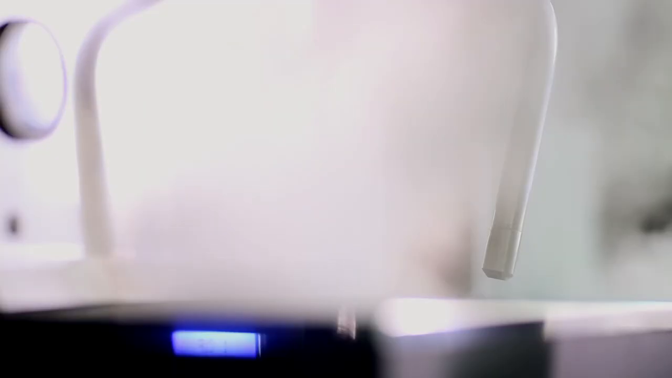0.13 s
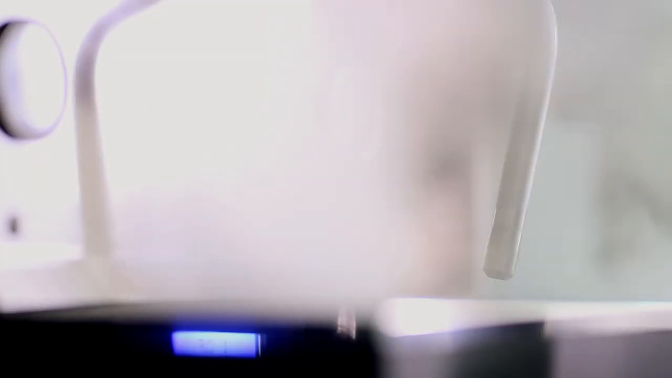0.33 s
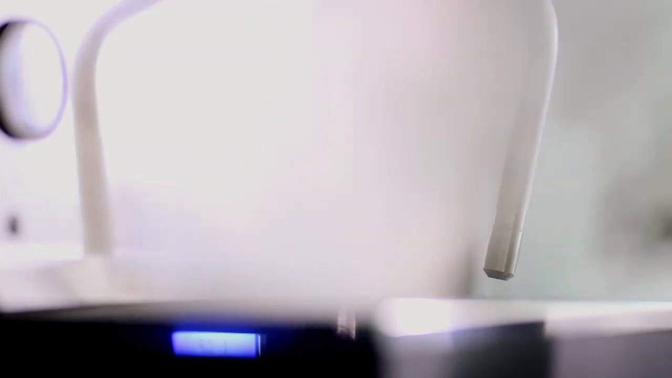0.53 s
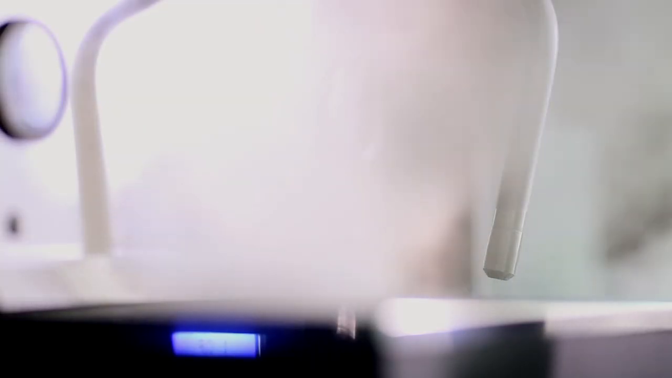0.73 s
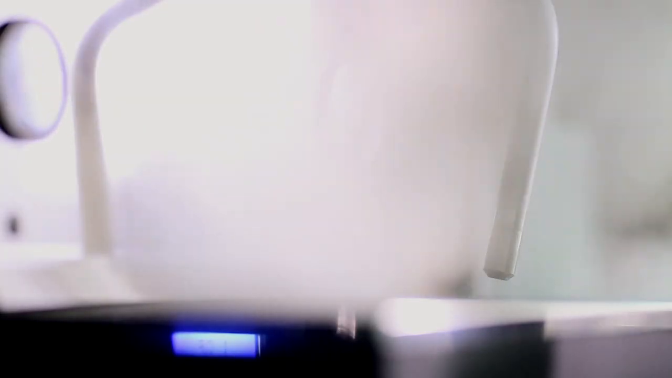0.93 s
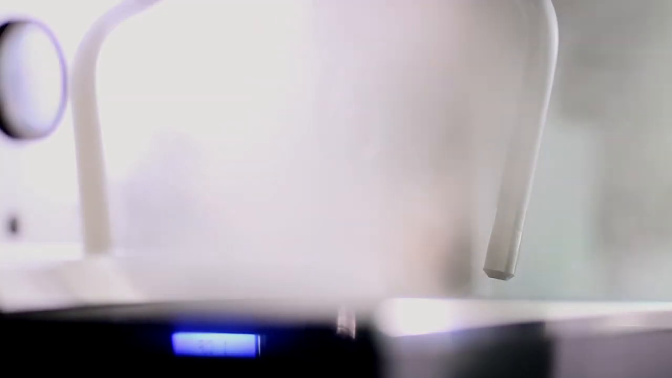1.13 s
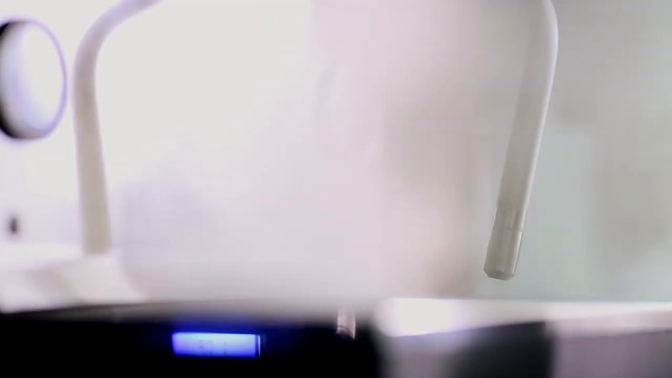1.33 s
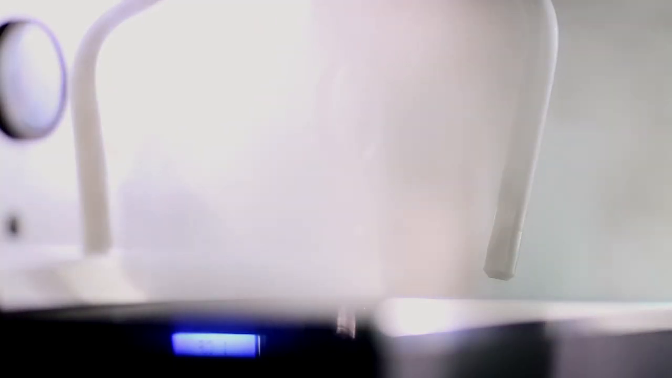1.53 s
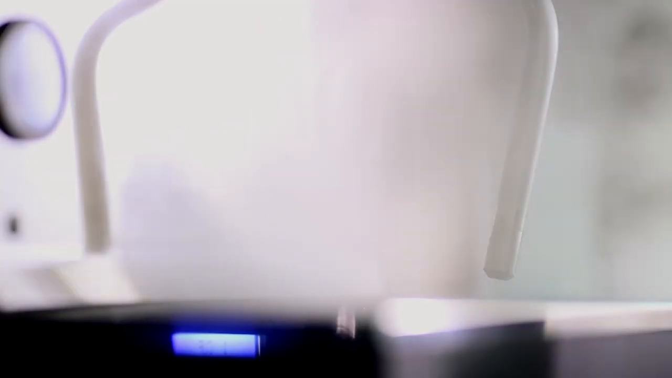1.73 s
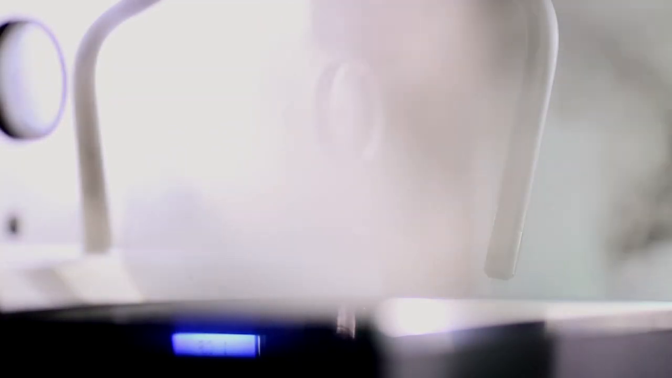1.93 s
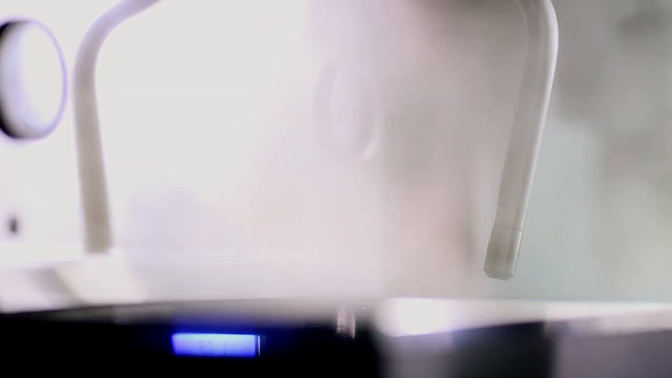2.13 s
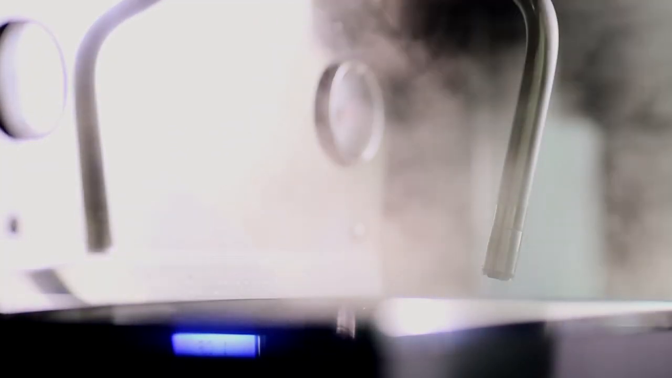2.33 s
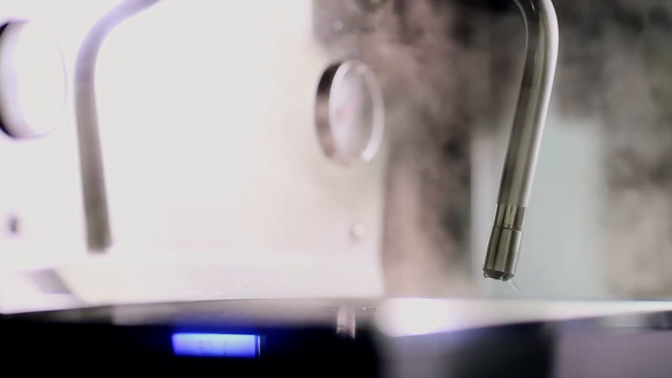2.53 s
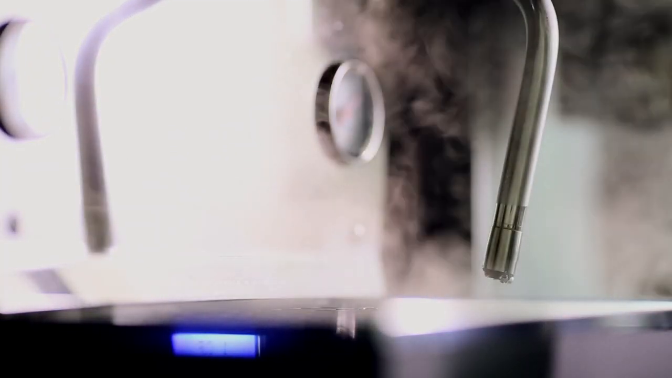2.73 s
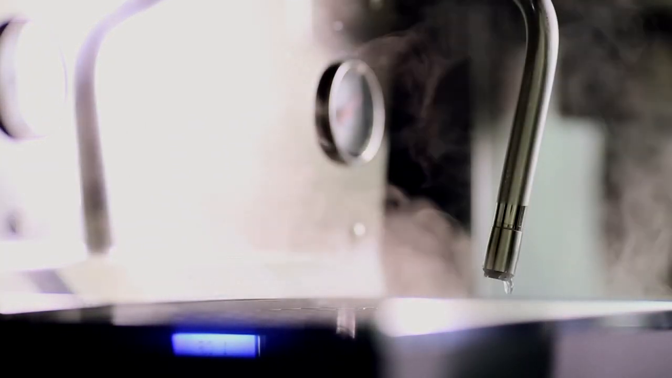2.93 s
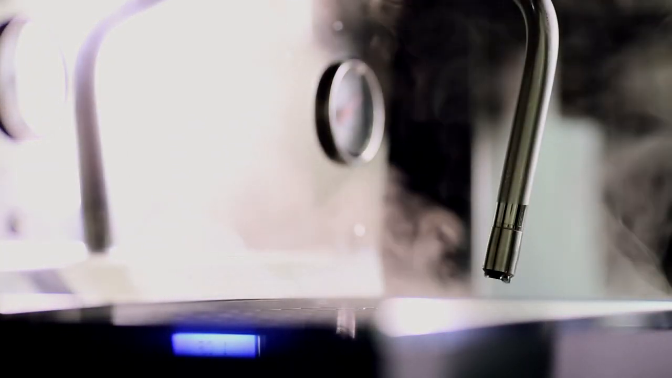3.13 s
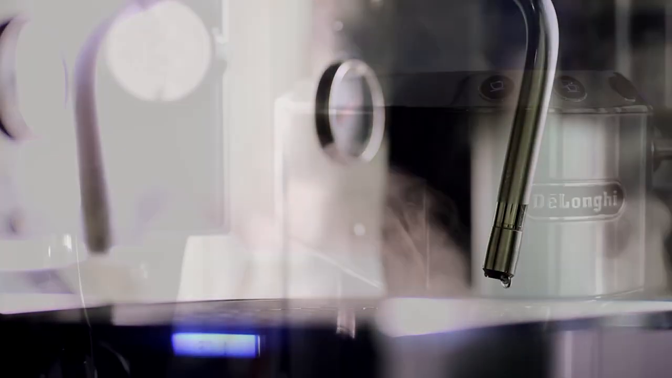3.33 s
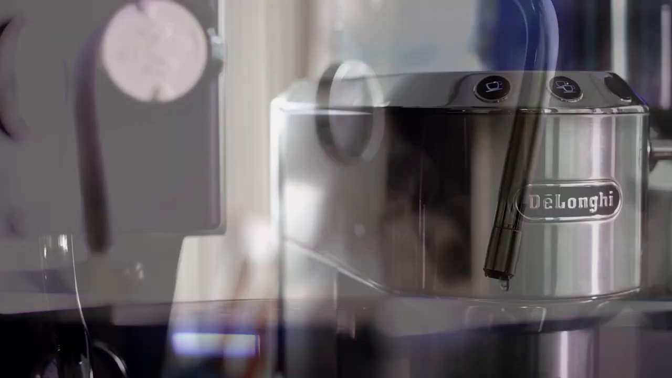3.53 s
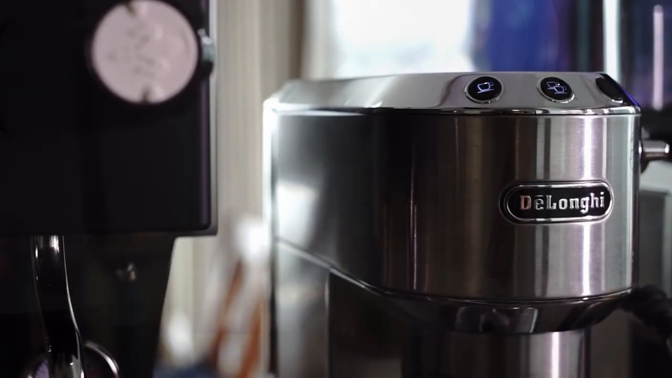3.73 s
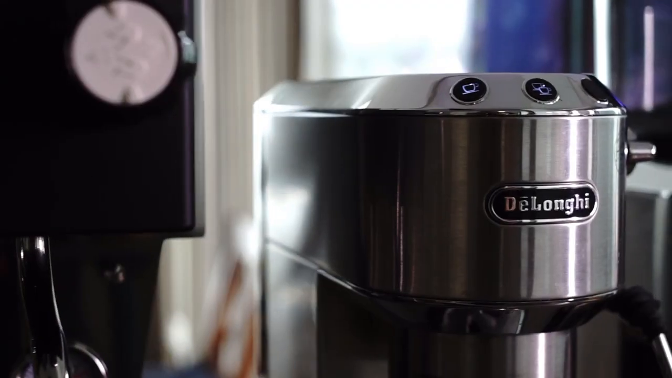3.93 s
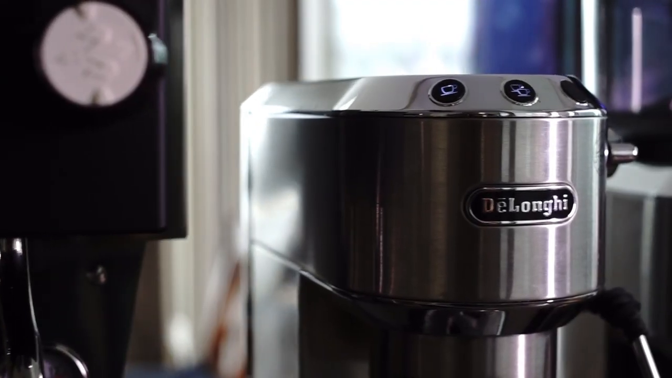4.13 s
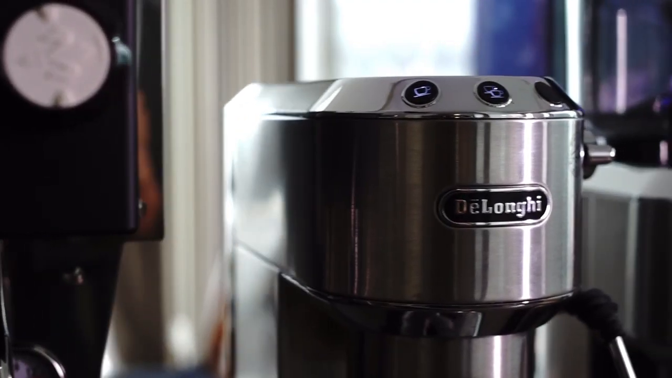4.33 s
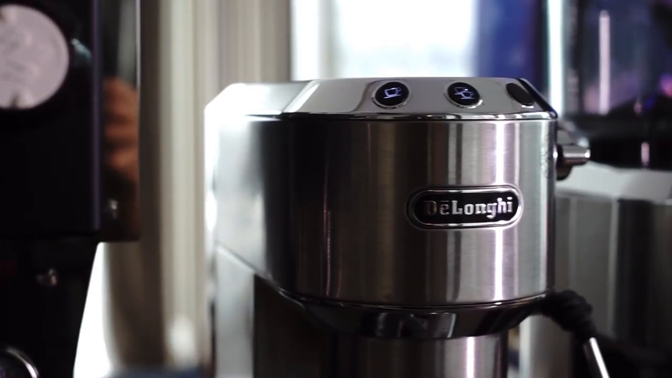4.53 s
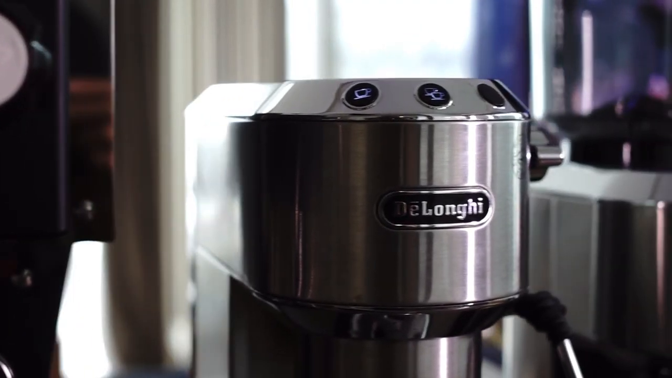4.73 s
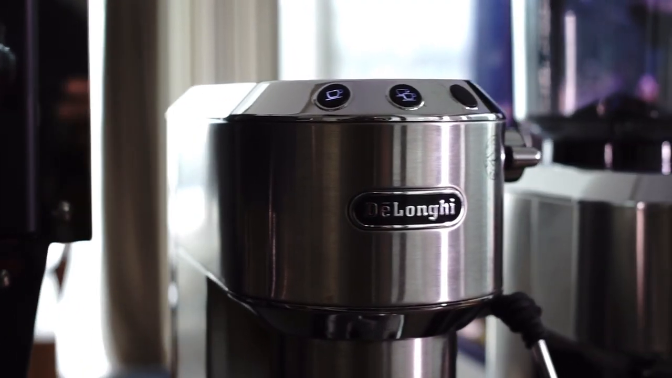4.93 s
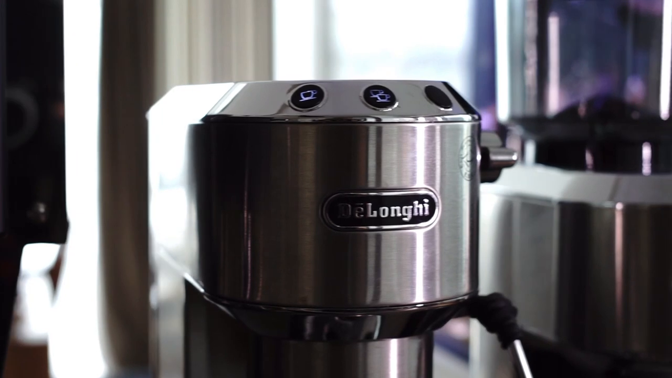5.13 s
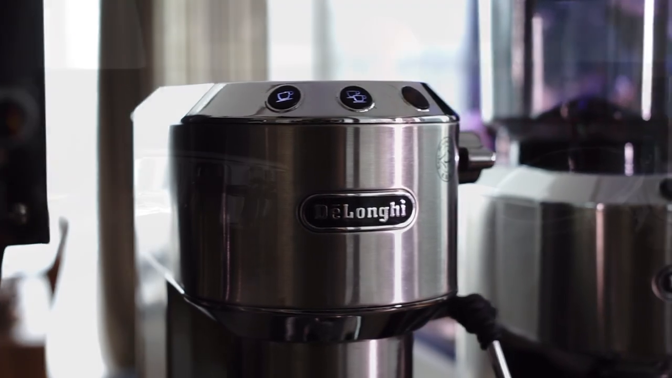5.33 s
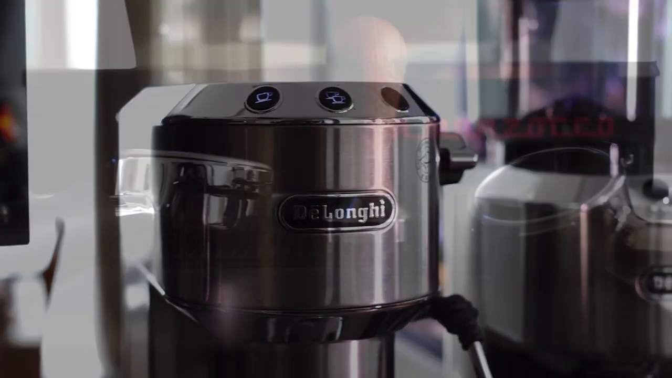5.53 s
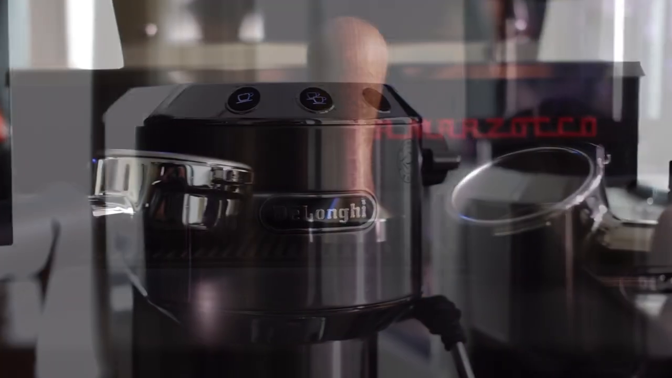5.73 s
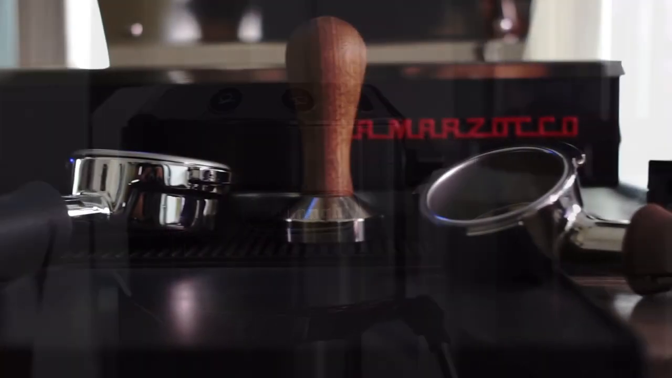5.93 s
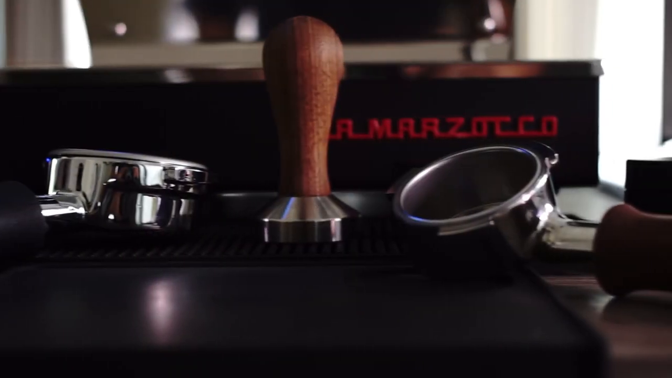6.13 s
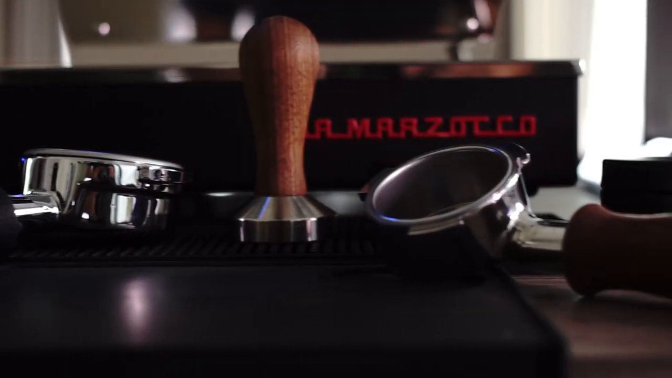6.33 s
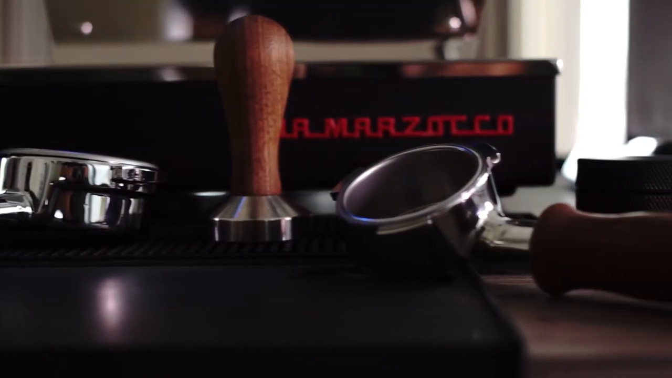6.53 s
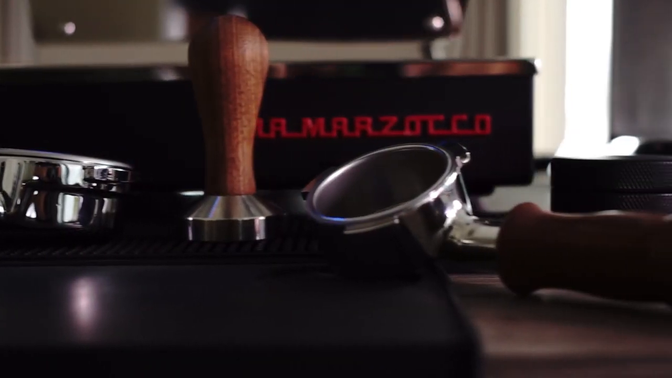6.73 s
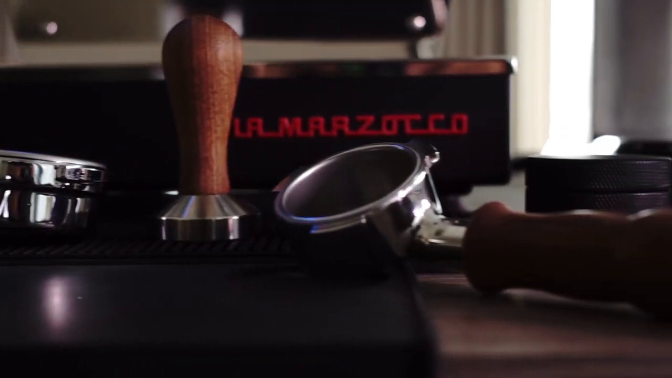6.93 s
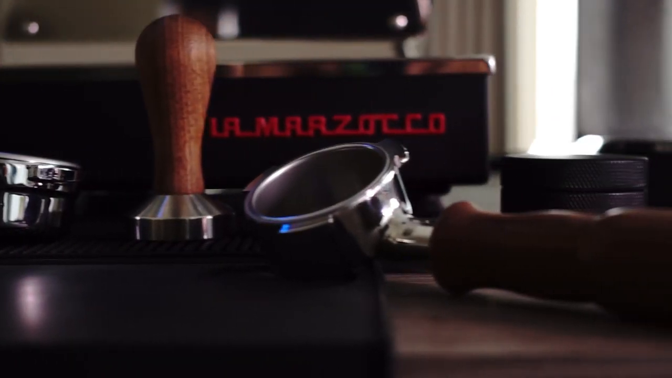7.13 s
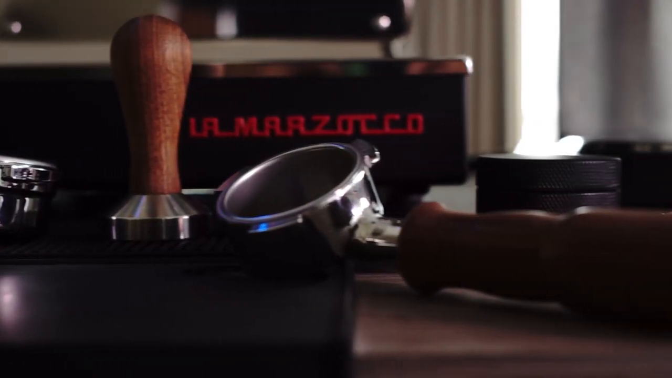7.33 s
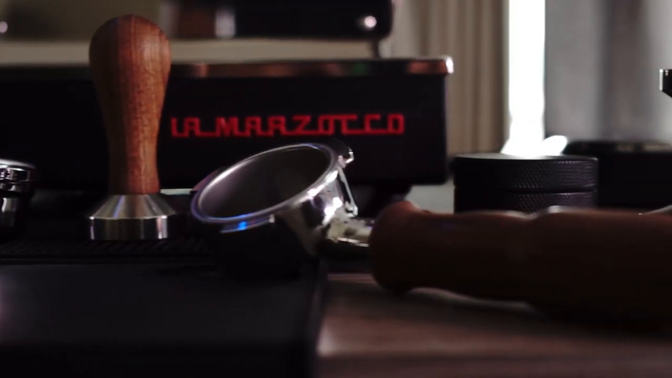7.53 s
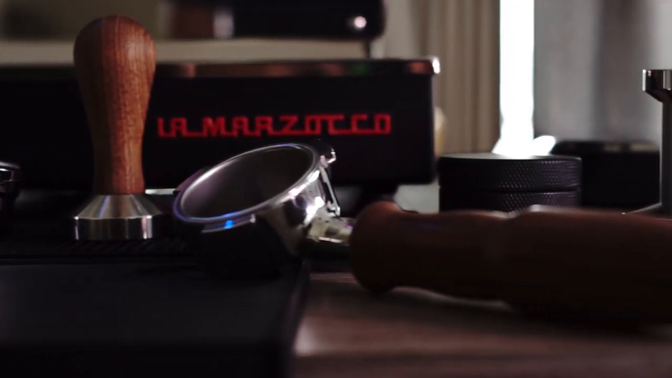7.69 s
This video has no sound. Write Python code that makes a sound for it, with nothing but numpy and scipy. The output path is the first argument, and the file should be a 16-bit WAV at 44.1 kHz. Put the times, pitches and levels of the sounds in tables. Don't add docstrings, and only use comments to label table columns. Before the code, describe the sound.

A dense steam jet starts already at full force, with a roaring tube and wash on metal beneath it, miked closely in mono. It collapses quickly into sputters and plops. Afterwards everything is very quiet: swelling low room hum, compressor drone, tiny distant metallic ticks in stereo, and finally muffled cabinet knocks, faint duct tones and light crockery touches.

```python
import sys
import numpy as np
from scipy import signal
from scipy.fft import rfft, irfft, next_fast_len
from scipy.io import wavfile
from scipy.ndimage import uniform_filter1d, map_coordinates

SR = 44100
rng = np.random.default_rng(int(sys.argv[2]) if len(sys.argv) > 2 else 0)


def generate_wav(sig):
    pcm = np.round(np.clip(np.atleast_2d(sig).T, -1, 1) * 32767).astype(np.int16)
    wavfile.write(sys.argv[1], SR, pcm)


def field_ratio(decibels):
    return 10 ** (np.asarray(decibels, dtype=float) / 20)


N = 342216
T = np.arange(N) / SR


def unit(x):
    return x / np.sqrt(np.mean(x ** 2) + 1e-20)


def along(points, hz):
    f, v = np.transpose(points)
    return np.interp(np.log(hz + 1), np.log(f + 1), v)


def laid(x, start_s):
    start = round(start_s * SR)
    out = np.zeros(x.shape[:-1] + (N,))
    out[..., start:][..., :x.shape[-1]] = x[..., :N - start]
    return out


def wobble(rate):
    coarse = np.arange(0, N + 64, 64)
    knots = rng.standard_normal(int(N * rate / SR) + 40)
    return np.interp(np.arange(N), coarse, map_coordinates(knots, [coarse * rate / SR]))


def swelling(rest_db, swells):
    t = np.arange(0, N + 64, 64) / SR
    bumps = sum(field_ratio(db) ** 2 * np.exp(-(2.4 * (t - s) / length) ** 2) for s, length, db in swells)
    return np.interp(T, t, np.sqrt(field_ratio(rest_db) ** 2 + bumps))


def filtered(x, response):
    m = next_fast_len(x.shape[-1] + 8192)
    return irfft(rfft(x, m) * response(np.fft.rfftfreq(m, 1 / SR)), m)[..., :x.shape[-1]]


def resonant(modes, hz):
    return np.sqrt(sum(field_ratio(db) ** 2 / w / (1 + (2 * (hz - c) / w) ** 2) ** 2 for c, w, db in modes))


def patchy(patchy_db, size, channels=1):
    z = signal.stft(rng.standard_normal((channels, size)), nperseg=512)[2]
    field = uniform_filter1d(rng.standard_normal(z.shape[1:]), size=6, axis=0)
    field = uniform_filter1d(field, size=10, axis=1)
    return signal.istft(z * field_ratio(patchy_db * unit(field)), nperseg=512)[1][:, :size]


def jet_band(spectrum, patchy_db, walls):
    t = np.arange(SR // 8) / SR
    walls_answer_late = np.clip(t / 0.012 - 1, 0, 1)
    echo = rng.standard_normal(len(t)) * field_ratio(-60 * t / 0.13) * walls_answer_late
    echo /= np.linalg.norm(echo)

    def response(hz):
        comb = 1 + walls * rfft(echo, 2 * len(hz) - 2)
        no_bass = hz ** 3 / (hz ** 3 + 220 ** 3)
        return field_ratio(along(spectrum, hz)) * no_bass * comb

    return laid(unit(filtered(patchy(patchy_db, size=4 * SR)[0], response)), 0)


EVENING = 0.65


def singing(mode, alike):
    hz, width_hz, db = mode
    m = next_fast_len(N)
    bins = np.fft.rfftfreq(m, 1 / SR)
    near = np.abs(bins - hz) < 10 * width_hz
    spectrum = np.zeros((2, len(bins)), complex)
    draws = rng.standard_normal((2, len(bins), 2))[:, near] @ [1, 1j]
    spectrum[:, near] = draws * resonant([(hz, width_hz, 0)], bins[near])
    pair = unit(irfft(spectrum, m)[:, :N])
    beat = int(np.clip(SR / width_hz / 4, SR // 200, SR // 30))
    strength = np.sqrt(np.abs(uniform_filter1d(pair ** 2, size=beat, axis=1)) + 0.05)
    shared, apart = pair / strength ** EVENING
    turn = np.arccos(np.clip(along(alike, hz), -1, 1)) / 2
    return field_ratio(db) * unit(np.cos(turn) * shared + np.sin(turn) * apart * [[1], [-1]])


DUCK_DB, RECOVER_FROM_S, RECOVER_S = 10.5, 2.075, 0.84


def recovering():
    return -DUCK_DB * np.clip(1 - (T - RECOVER_FROM_S) / RECOVER_S, 0, 1)


# [t/s, jump level/dB, sag time/s]
SURGES = [
    (0.0, 3, 0.088),
    (.085, 2, 0.14),
    (.485, 1.5, 0.041),
    (.5, 1.5, 3),
    (.7, -0.2, 0.072),
    (1.899, 0.5, 0.089),
    (2.05, 1, 0.1),
]
# [t/s, level/dB]
VALVE = [
    (2.135, -1.5),
    (2.178, -10),
    (2.218, -12),
    (2.278, -21.5),
    (2.33, -18.5),
    (2.43, -33),
    (2.6, -33),
    (2.74, -38),
]
SURGE_RISE_S = 0.0063


def steam():
    press_db = 0
    for s, db, sag_s in SURGES:
        rise = np.clip((T - s) / SURGE_RISE_S + (s == 0), 0, 1)
        press_db = press_db + db * rise * np.exp(-np.abs(T - s) / sag_s)
    flow_db = np.interp(T, *np.transpose(VALVE))
    flutter_db = 0.17 * wobble(15.0) + 0.2 * wobble(24.17)
    flowing = np.clip((2.66 - T) / 0.18, 0, 1)
    jet = wand_roar(press_db, flow_db, flutter_db) + tray_wash(press_db, flow_db, flutter_db)
    jet += wet_lip(press_db, flow_db) + tray_pool(flow_db)
    hiss = nozzle_hiss(press_db, flow_db, flutter_db, flowing)
    return hiss + np.sqrt(flowing) * jet + kitchen_air()


# [f/Hz, level/dB per Hz]
NOZZLE = [(2350, -26.5), (4000, -11), (4560, -11), (4900, -6), (5100, -4), (5600, -3.5), (6100, -2.5),
          (6850, -3.5), (11700, -3.5), (13200, -4.5), (15500, -8.5)]
# [f/Hz, level/dB per Hz]
DRIBBLE = [(2350, -23.5), (4000, -13), (7250, -12), (10800, -19.5), (11700, -20.5), (14000, -25),
           (15500, -27)]
HISS_DB, AIR_DB = -18.5, -56


def nozzle_hiss(press_db, flow_db, flutter_db, flowing):
    strong = np.clip((flow_db + 21.0) / 14, 0, 1)
    hiss = np.sqrt(strong) * jet_band(NOZZLE, 0.37, walls=0.35)
    hiss += np.sqrt(1 - strong) * jet_band(DRIBBLE, 1.5, walls=0.11)
    jet_gain = flowing ** 0.22 * field_ratio(HISS_DB + press_db + flow_db)
    return hiss * np.hypot(jet_gain, field_ratio(AIR_DB + recovering())) * field_ratio(flutter_db)


# [f/Hz, level/dB per Hz]
WAND = [(240, -15), (380, -15.5), (440, -6.5), (516, -15), (650, -5), (780, -6.5), (890, 0.5), (1000, -5.5),
        (1076, -2), (1125, -13.5), (1200, -8), (1500, -22), (1950, -19), (3300, -120)]
ROAR_DB, ROAR_SWINGS, ROAR_FALLS = -41, 1.84, 0.49


def wand_roar(press_db, flow_db, flutter_db):
    level_db = ROAR_DB + ROAR_SWINGS * press_db + ROAR_FALLS * flow_db + 0.24 * flutter_db
    return field_ratio(level_db) * jet_band(WAND, 0.93, walls=0.39)


# [f/Hz, level/dB per Hz]
TRAY = [(740, -33), (1200, -5), (1460, -1), (1720, -5.5), (1980, -2.5), (2100, -6), (2280, -4), (2520, -6),
        (2670, -0.5), (2840, -1.5), (3010, -1.5), (3360, -5.5), (3950, -4), (4600, -3.5), (5980, -26),
        (10100, -120)]
WASH_DB, WASH_SWINGS, WASH_FALLS = -34.5, 1.92, 0.76


def tray_wash(press_db, flow_db, flutter_db):
    level_db = WASH_DB + WASH_SWINGS * press_db + WASH_FALLS * flow_db + 0.2 * flutter_db
    return field_ratio(level_db) * jet_band(TRAY, 0.75, walls=0.42)


# [f/Hz, level/dB per Hz]
LIP = [(3000, -38), (3700, -9), (4090, -5), (4500, -12), (4780, -6), (4930, 2), (5080, -8), (5800, -40)]
LIP_DB, LIP_SWINGS, LIP_DRIES_DB_PER_S = -34.5, 1.6, 5


def wet_lip(press_db, flow_db):
    level_db = LIP_DB + LIP_SWINGS * press_db + flow_db - LIP_DRIES_DB_PER_S * T
    return field_ratio(level_db) * jet_band(LIP, 1.1, walls=0.38)


# [f/Hz, level/dB per Hz]
POOL = [(1000, -35), (1300, -4), (1500, 0), (1900, -7), (2300, -35)]
POOL_SWELL = -60, [(.95, .3, -46), (1.25, 0.59, -43), (1.8, 0.66, -46)]


def tray_pool(flow_db):
    return swelling(*POOL_SWELL) * field_ratio(WASH_FALLS * flow_db) * jet_band(POOL, 1.1, walls=0.35)


# [f/Hz, level/dB per Hz]
KITCHEN = [(260, -30), (450, -14), (608, 2.5), (658, -1.5), (776, -1), (839, -2.5), (1090, -3),
           (2590, -11.5), (4600, -19.5), (5980, -27), (10100, -120)]
# [f/Hz, level/dB per Hz]
TOP_AIR = [(6000, -30), (9000, -3), (12000, 0), (15500, -6)]
TOP_AIR_SWELL = -90, [(3.4, .35, -66)]
KITCHEN_DB = -43.5


def kitchen_air():
    kitchen = field_ratio(KITCHEN_DB + recovering()) * jet_band(KITCHEN, 0.65, walls=0.07)
    return kitchen + swelling(*TOP_AIR_SWELL) * jet_band(TOP_AIR, 1.2, walls=0.05)


# [f/Hz, width/Hz, level/dB]
WAND_RING = [(796, 110, -3.5), (910, 80, -3), (450, 34, -5)]
RING = -52, [(2.316, .06, -43), (2.54, 0.13, -45)]
# [f/Hz, width/Hz, level/dB]
OVERTONE_MODE = (1920, 95, 0)
OVERTONE = -70, [(2.33, .07, -46.5), (2.49, 0.053, -54)]


def wand_ring():
    noise = rng.standard_normal(N)
    tube = unit(filtered(noise, lambda hz: resonant(WAND_RING, hz))) * field_ratio(1.2 * wobble(39.9))
    overtone = swelling(*OVERTONE) * singing(OVERTONE_MODE, [(100, 0.86)])[0]
    gate = np.clip((T - 2.26) / 0.035, 0, 1) * np.clip((2.58 - T) / 0.017, 0, 1)
    return (swelling(*RING) * tube + overtone) * gate


# [t/s, peak level/dB, low part level/dB, t60/s, ring f/Hz]
SPITS = [
    (2.317, -20, -10, 0.14, 1500),
    (2.4566, -38.5, -4, 0.13, 1500),
    (2.592, -29.5, 0.5, 0.22, 2460),
    (2.593, -35, 8, 0.08, 1820),
    (2.637, -38, 12, 0.091, 1750),
    (2.652, -31.5, 4, 0.2, 1300),
    (2.69, -40, 8, .08, 1400),
    (2.785, -40, 8, 0.08, 1100),
]


def spits():
    out, t = np.zeros(N + SR), np.arange(SR // 3) / SR
    puff = [(1500, -23), (3000, -4), (10000, -7), (14000, -24)]  # (Hz, dB per Hz)
    for s, db, low_db, t60, ring_hz in SPITS:
        high, low = rng.standard_normal((2, len(t)))
        high = unit(filtered(high, lambda hz: field_ratio(along(puff, hz))))
        low = unit(filtered(low, lambda hz: resonant([(900, 310, -3), (ring_hz, 200, 3)], hz)))
        shape = field_ratio(db - 16.0 - 60 * t / t60) * (1 - np.exp(-t / 0.0015))
        out[round(s * SR):][:len(t)] += shape * (high + field_ratio(low_db) * low)
    return out[:N]


def struck(rows, shape):
    out, t = np.zeros(N + SR), np.arange(SR // 10) / SR
    for s, db, *pitch in rows:
        out[round(s * SR):][:len(t)] += field_ratio(db) * shape(t, *pitch)
    return out[:N]


# [t/s, peak level/dB, f/Hz]
THUDS = [(5.977, -36, 557), (5.995, -38, 573), (6.032, -38, 541), (6.136, -38, 528), (6.193, -34, 581),
         (6.243, -37, 576), (6.263, -35, 576), (6.303, -41, 533), (6.41, -37, 592), (6.565, -30, 603),
         (6.625, -34, 560), (6.651, -36, 533), (6.7, -38, 476), (6.908, -40, 584), (7.123, -38, 576),
         (7.238, -39, 595), (7.324, -40, 528), (7.406, -40, 530), (7.447, -40, 571), (7.492, -40, 581),
         (7.562, -38, 624), (7.611, -35, 592), (7.678, -39, 603), (7.7, -39, 581)]
THUD_RISE_S, THUD_T60_S = 0.003, 0.066


def thuds():
    def bump(t, hz):
        wander = 2.1 * np.cumsum(rng.standard_normal(len(t))) / 30
        shape = field_ratio(-60 * t / THUD_T60_S) * (1 - np.exp(-t / THUD_RISE_S))
        return np.sin(2 * np.pi * hz * t + wander) * shape
    return field_ratio(-5) * struck(THUDS, bump)


# [t/s, peak level/dB, first f/Hz, last f/Hz]
SNAPS = [
    (7.6005, -48, 2400, 1000),
    (7.7345, -40, 3600, 1850),
    (7.738, -45, 1900, 1400),
    (5.328, -50, 5000, 2500),
    (4.41, -51, 5900, 2800),
]
SNAP_S = 0.0035


def snaps():
    def snap(t, first_hz, last_hz):
        hz = last_hz + (first_hz - last_hz) * np.exp(-2 * t / SNAP_S)
        shape = np.exp(-(t / SNAP_S) ** 2) * (1 - np.exp(-t / 0.0004))
        return np.sin(2 * np.pi * np.cumsum(hz) / SR) * shape
    return struck(SNAPS, snap)


def ticks(rows, width_hz, hiss_from_hz, rise_s):
    def hiss_band(hz):
        return 1 / (1 + (hiss_from_hz / (hz + 1)) ** 6) / (1 + (hz / 13000) ** 4)

    out, t = np.zeros((2, N + SR)), np.arange(SR // 8) / SR
    for s, db, ring_hz, wide_db, t60 in rows:
        ring, wide = rng.standard_normal((2, 2, len(t)))
        ring = unit(filtered(ring, lambda hz: resonant([(ring_hz, width_hz, 0)], hz)))
        wide = unit(filtered(wide, hiss_band))
        shape = field_ratio(-60 * t / t60) * (1 - np.exp(-t / rise_s))
        puff = shape * (field_ratio(db + 1.0) * ring + field_ratio(wide_db + 10.0) * wide)
        out[:, round((s - rise_s / 2) * SR):][:, :len(t)] += puff
    return out[:, :N]


# [t/s, peak level/dB, ring f/Hz, wide hiss level/dB, t60/s]
TICKS = [(3.1228, -43, 3000, -66, 0.064), (3.255, -42, 3750, -66.5, 0.067), (3.8661, -46, 3700, -58, 0.15),
         (4.409, -43, 3460, -53.5, 0.13), (4.7651, -52, 4630, -53, 0.12), (5.2485, -49, 3680, -57, 0.094),
         (5.3273, -45, 3100, -50.5, 0.14), (5.7994, -54, 4060, -55.5, 0.19), (6.123, -44, 3050, -60, 0.08),
         (6.2994, -48, 4600, -69, 0.096), (7.162, -48, 4500, -62, 0.086), (6.226, -46, 3500, -66, 0.07),
         (6.33, -45, 3100, -62, 0.08), (6.1, -52, 6000, -69, 0.06), (4.655, -45, 2900, -69, 0.078)]
# [t/s, peak level/dB, ring f/Hz, wide hiss level/dB, t60/s]
EXTRA_TICK = [
    (3.26, -47.5, 4650, -66, 0.12),
]
# [t/s, peak level/dB, ring f/Hz, wide hiss level/dB, t60/s]
BRIGHT_TICKS = [(3.5184, -50, 11100, -59, 0.06), (3.875, -49, 8400, -66, 0.07),
                (4.0886, -43, 12500, -59, 0.06), (4.3294, -47, 14200, -63, 0.052),
                (4.6994, -49, 7150, -64.5, 0.13), (5.442, -48, 7000, -69, 0.08),
                (3.325, -56, 8000, -71, 0.085), (5.2894, -47, 7290, -60, 0.066),
                (5.442, -47, 12800, -56, 0.076), (5.541, -46, 6960, -57, 0.084),
                (5.6201, -48, 9880, -61, 0.06), (5.9594, -51, 11600, -62, 0.06),
                (6.1794, -49, 8130, -59, 0.079), (6.6782, -50, 8600, -63, 0.12),
                (6.645, -53, 10600, -68, .07), (7.177, -55, 8600, -66, .05), (7.44, -53, 12500, -56, 0.078)]
# [t/s, peak level/dB, ring f/Hz, wide hiss level/dB, t60/s]
TOP_TICKS = [
    (4.7247, -47, 13700, -60, 0.08),
    (5.249, -51, 10200, -59, 0.08),
    (5.7194, -56, 11700, -65, 0.08),
    (6.6782, -54, 13500, -64, 0.15),
    (7.27, -56, 13000, -68, .06),
    (7.7194, -49, 9630, -65, 0.08),
    (3.588, -53, 13000, -63, 0.05),
    (3.71, -54, 13500, -66, 0.06),
    (5.29, -54, 15000, -68, 0.05),
]
# [t/s, peak level/dB, ring f/Hz, wide hiss level/dB, t60/s]
CLICKS = [
    (7.529, -41, 1530, -61, 0.033),
    (7.515, -46, 2300, -64, 0.04),
    (7.542, -47, 2900, -64, 0.04),
    (7.5544, -40, 2080, -59, 0.03),
    (7.6005, -34, 2060, -61, 0.02),
    (7.7343, -39, 2600, -58, 0.019),
]
# [t/s, peak level/dB, ring f/Hz, wide hiss level/dB, t60/s]
CHIRPS = [(4.266, -45, 4500, -72, .05), (4.268, -47, 5150, -72, .045), (4.596, -44, 4400, -72, .07),
          (4.764, -41, 4500, -70, .07), (4.768, -44, 4950, -72, .06), (4.779, -43, 4550, -72, .06),
          (5.595, -44, 4280, -70, .07), (5.79, -45, 2780, -70, .06), (6.86, -53, 4100, -72, .12),
          (7.02, -49, 3500, -66, .05), (7.205, -50, 3600, -72, .08), (7.18, -49, 1900, -66, .06)]


def far_ticks():
    far = ticks(TICKS + EXTRA_TICK, 650, 2300, 0.008)
    far += ticks(BRIGHT_TICKS, 1300, 7000, 0.0079)
    far += ticks(TOP_TICKS, 2200, 9000, 0.009)
    far += field_ratio(-3.0) * ticks(CLICKS, 1600, 6000, 0.00147)
    return far + ticks(CHIRPS, 330, 3000, 0.0054)


def room_noise(colour, modes, alike, lean_db, patchy_db):
    def mid_side(hz):
        turn = np.arccos(np.clip(along(alike, hz), -1, 1)) / 2
        gain = np.hypot(field_ratio(along(colour, hz) - 21), resonant(modes, hz))
        return gain * [np.cos(turn), np.sin(turn)]

    mid, side = filtered(patchy(patchy_db, size=4 * SR, channels=2), mid_side)
    return np.array([mid + side, mid - side]) * field_ratio([[lean_db / 2], [-lean_db / 2]])


def split(x, low_hz, high_hz, start_s):
    low = filtered(x, lambda hz: 1 / (1 + (hz / low_hz) ** 8))
    high = filtered(x, lambda hz: 1 - 1 / (1 + (hz / high_hz) ** 8))
    return [laid(unit(part), start_s) for part in (low, x - low - high, high)]


# [f/Hz, level/dB per Hz]
HUM_COLOUR = [(15, -55), (25, -14.5), (65, -19), (128, -8), (243, -1.5), (330, -4), (364, -10), (430, -6.5),
              (600, -13), (700, -41), (910, -46), (1540, -120)]
# [f/Hz, width/Hz, level/dB]
HUM_MODES = [(179.3, 3.1, -5.5), (379, 15, -13.5)]
MOTOR = -51.5, [(3.18, 0.36, -46)]
FIRST_MODE = -52, [(2.76, 0.042, -36), (2.95, 0.21, -39.5), (3.3, 0.17, -42)]
FIRST_LOW_MODE = -59, [(2.1, .15, -42), (2.88, 0.19, -41), (3.15, 0.38, -44.5)]
HUM_DB, RUMBLE_DB, MOTOR_HZ = -41, -60.5, 135


def hum():
    room = room_noise(HUM_COLOUR, HUM_MODES, [(100, 0.96)], 0, 0.58)[0]
    rumble, body, _ = split(room, 98, 3000, 0)
    motor = np.sin(2 * np.pi * np.cumsum(MOTOR_HZ + 0.45 * wobble(3.3)) / SR)
    motor *= field_ratio(3.5 + 1.1 * wobble(7.64)) * swelling(*MOTOR)
    mode = swelling(*FIRST_MODE) * singing((246, 20, -2), [(100, 0.88)])[0]
    mode += swelling(*FIRST_LOW_MODE) * singing((175, 10, -2), [(100, 0.88)])[0]
    return field_ratio(recovering()) * (field_ratio(HUM_DB) * body + field_ratio(RUMBLE_DB) * rumble + motor + mode)


# [f/Hz, level/dB per Hz]
SECOND_COLOUR = [(15, -50), (25, -13), (59, -12.5), (113, -9), (164, -5), (221, -5.5), (253, -3.5),
                 (331, -8.5), (537, -17.5), (614, -19.5), (1110, -24), (3720, -35.5), (4150, -36),
                 (4500, -36.5), (12000, -45), (15500, -47)]
# [f/Hz, width/Hz, level/dB]
SECOND_MODES = [(166, 30, -13), (424, 13, -17), (520, 25, -20), (2850, 120, -30)]
# [f/Hz, left-right likeness/1]
SECOND_ALIKE = [(60, 1.0), (130, 0.99), (290, 0.97), (640, 0.81), (1410, 0.43), (3100, 0.39), (6820, -0.41),
                (15000, 0.35)]
SECOND_MODE = -64, [(3.92, 0.11, -40), (4.12, 0.097, -37.5), (4.4, 0.16, -38), (4.57, 0.19, -37),
               (4.86, 0.15, -37), (5.03, 0.088, -41.5), (5.17, 0.11, -40), (5.4, .1, -43)]
SECOND_LOW_MODE = -54, [(3.62, .15, -40), (3.85, .3, -45.5), (4.5, 0.4, -42.5), (5.15, 0.18, -40.5),
                   (5.45, .25, -45)]
SECOND_LOW_DB, SECOND_MID_DB, SECOND_AIR_DB = -40, -46.5, -59
DRONE_HZ, DRONE_DB = 66.5, -49


def second_place():
    room = room_noise(SECOND_COLOUR, SECOND_MODES, SECOND_ALIKE, -0.68, 0.84)
    low, mid, air = split(room, 525, 2900, 3)
    tone = field_ratio(SECOND_LOW_DB + 1.1 * wobble(4.97)) * low + field_ratio(SECOND_MID_DB) * mid
    tone += field_ratio(SECOND_AIR_DB + 5.0 + 0.37 * wobble(7.3)) * air
    drone = np.sin(2 * np.pi * np.cumsum(DRONE_HZ + 0.35 * wobble(2.87)) / SR)
    drone *= field_ratio(DRONE_DB + 3.0 + 0.3 * wobble(6))
    mode = swelling(*SECOND_MODE) * singing((251, 5, -2), SECOND_ALIKE)
    mode += swelling(*SECOND_LOW_MODE) * singing((167, 7, -2), SECOND_ALIKE)
    return tone + mode * field_ratio([[-0.6], [0.6]]) + drone


# [f/Hz, level/dB per Hz]
THIRD_COLOUR = [(15, -46), (25, -13), (59, -19.5), (164, -4.5), (253, -7.5), (399, -14), (582, -9.5),
                (666, -21.5), (945, -26.5), (1140, -34), (1240, -36), (1710, -40.5), (4150, -39.5),
                (11500, -50), (15500, -53)]
# [f/Hz, width/Hz, level/dB]
THIRD_MODES = [(96.4, 9.2, -13), (242, 13, -11), (567, 8.6, -17), (612, 13, -15.5), (716, 4, -24.5)]
# [f/Hz, left-right likeness/1]
THIRD_ALIKE = [(60, 0.98), (130, 1), (290, 0.96), (640, 0.77), (1410, 0.037), (3100, 0.091), (6820, -0.32),
               (15000, 0.29)]
THIRD_MIDDLE = -49, [(5.88, 0.16, -46), (6.01, .06, -47), (6.14, .05, -48), (6.25, .08, -47),
                (6.42, .04, -46), (6.5, .1, -55), (6.61, 0.11, -45), (6.75, .04, -46), (6.83, 0.092, -43.5),
                (7.14, .05, -45), (7.5, .03, -50), (7.56, 0.027, -49), (7.62, .04, -45), (7.71, 0.087, -48)]
THIRD_MODE = -50.5, [(6.05, 0.15, -43), (6.3, 0.16, -40), (6.88, 0.096, -35), (7.04, 0.09, -43),
              (7.38, 0.13, -41), (7.68, 0.25, -37.5)]
THIRD_HIGH_MODE = -62, [(6.13, .15, -40), (6.45, .2, -46), (6.75, 0.16, -45)]
# [f/Hz, width/Hz, level/dB]
DUCT_MODES = [(670, 51, 4), (953, 53, 6), (1063, 47, 8.5)]
# [t/s, length/s, level/dB]
DUCTS = [
    (-68, [(5.84, 0.28, -51)]),
    (-71, [(6.6, 0.22, -67), (7.15, .05, -61), (7.3, .05, -63), (7.53, .12, -62)]),
    (-79, [(7.17, .16, -66), (7.33, .12, -62.5), (7.4, .1, -68)]),
]
THIRD_LOW_DB, THIRD_AIR_DB = -41.5, -52.5


def third_place():
    room = room_noise(THIRD_COLOUR, THIRD_MODES, THIRD_ALIKE, -1.3, 0.66)
    low, mid, air = split(room, 415, 1070, 4)
    tone = field_ratio(THIRD_LOW_DB) * low + swelling(*THIRD_MIDDLE) * field_ratio(0.6 * wobble(18.0)) * mid
    tone += field_ratio(THIRD_AIR_DB + wobble(5.3) / 2) * air
    ducts = sum(swelling(*duct) * singing(mode, THIRD_ALIKE) for duct, mode in zip(DUCTS, DUCT_MODES))
    mode = swelling(*THIRD_MODE) * singing((167, 9, -2), THIRD_ALIKE)
    mode += swelling(*THIRD_HIGH_MODE) * singing((243, 9, -2), THIRD_ALIKE)
    return tone + (ducts + mode) * field_ratio([[-0.6], [0.6]])


# [f/Hz, width/Hz, level/dB]
WHINE_MODES = [(3672, 24, 6.5), (7400, 50, 6), (8100, 50, 6), (11450, 720, 7)]
# [t/s, length/s, level/dB]
WHINES = [
    (-87, [(4.1, .6, -73), (4.4, .3, -71), (4.68, .15, -71), (4.95, .4, -72), (5.2, .3, -69), (5.43, 0.2, -64), (5.68, .3, -71), (7.2, .1, -73)]),
    (-90, [(4.05, .5, -77), (4.85, .4, -72), (5.2, .2, -71), (5.45, .2, -74)]),
    (-86, [(5.45, .1, -75), (6.2, .35, -72), (7.65, .35, -69.5)]),
    (-76.5, [(3.8, .5, -77), (4.5, .6, -79), (4.9, .18, -71), (5.45, .2, -71), (6.1, .5, -76), (6.52, 0.12, -70)]),
]


def whines():
    total = 0
    for whine, mode in zip(WHINES, WHINE_MODES):
        total = total + swelling(*whine) * field_ratio(0.7 * wobble(20.0)) * singing(mode, SECOND_ALIKE)
    return total


# [start t/s, end t/s]
FADES = [
    (3.35, 3.78),
    (5.4, 6.02),
]


def scene():
    into_second, into_third = [np.clip((T - start) / (end - start), 0, 1) for start, end in FADES]
    far = far_ticks()
    first = steam() + wand_ring() + spits() + hum() + np.sqrt(2) * far[0]
    later = (1 - into_third) * second_place() + into_third * third_place()
    later = later + whines() + far + snaps() + thuds()
    return (1 - into_second) * first + into_second * later


def low_pass(x):
    return signal.sosfilt(signal.butter(12, 17050, fs=SR, output="sos"), x)


# [centre t/s, from f/Hz, to f/Hz]
NOISE_FILL = [(0.047, 6830.0, 9020.0), (0.117, 9560.0, 11090.0), (0.326, 8960.0, 10400.0),
              (0.581, 8940.0, 10360.0), (0.581, 12320.0, 13740.0), (0.604, 4260, 5100),
              (0.628, 4540.0, 5730.0), (0.628, 14400, 15800), (0.86, 11670.0, 13930.0),
              (1.208, 9000.0, 11130.0), (1.324, 6830.0, 8330.0), (1.835, 4180, 5120),
              (1.928, 5080.0, 6960.0), (1.928, 12400.0, 13890.0), (1.998, 5580.0, 6850.0),
              (2.09, 14400, 15800), (2.439, 5620.0, 7000.0), (3.042, 4240.0, 5100.0)]
TOP_HZ = 15740


def record(dry):
    out = filtered(dry, lambda hz: 1 / (1 + np.exp(np.clip((hz - TOP_HZ) / 25, -50, 50))))
    window = np.hanning(2048)
    for s, low_hz, high_hz in NOISE_FILL:
        def band(x):
            return filtered(x, lambda hz: (hz > low_hz) & (hz < high_hz))
        frame = out[:, round(s * SR) - 1024:][:, :2048]
        old = band(frame)
        new = np.std(old) * unit(band(rng.standard_normal(old.shape)))
        frame += new * window - old * (1 - np.sqrt(1 - window ** 2))
    return low_pass(out)


dry = scene()
out = record(dry)
generate_wav(out)
```